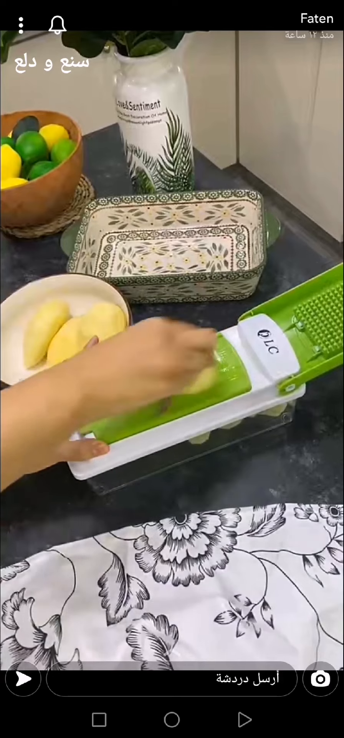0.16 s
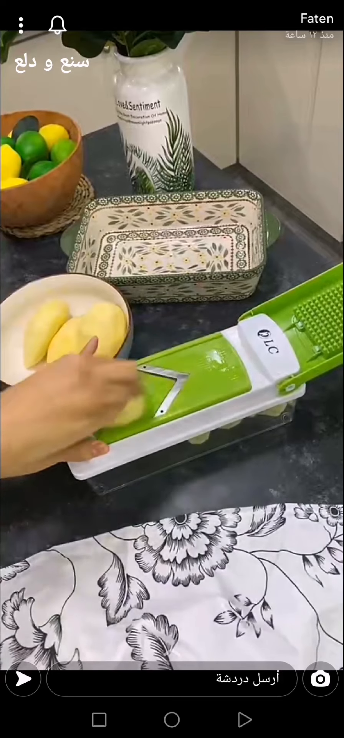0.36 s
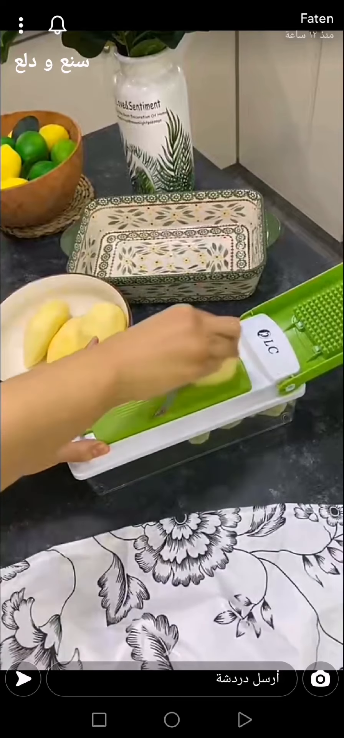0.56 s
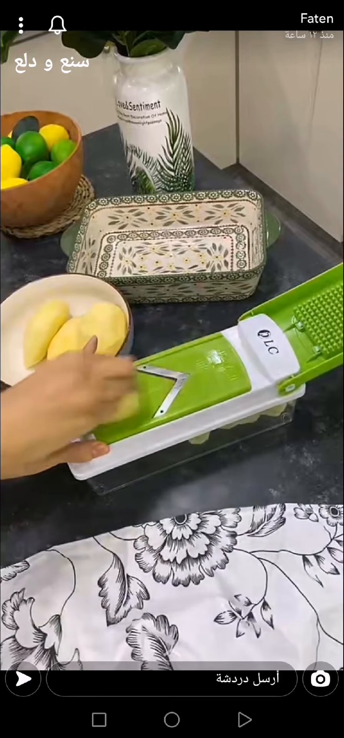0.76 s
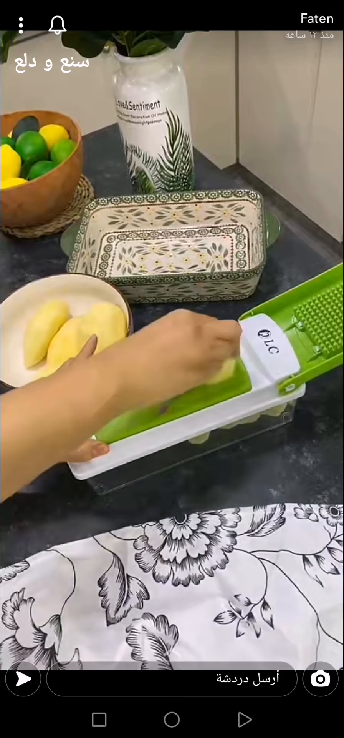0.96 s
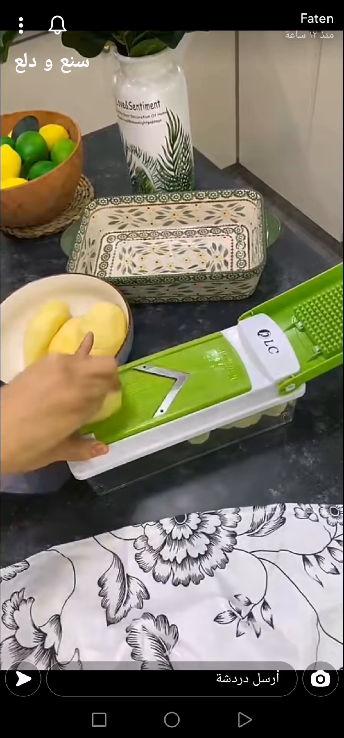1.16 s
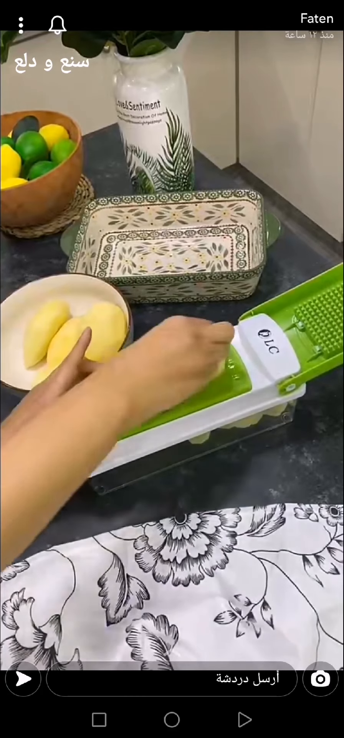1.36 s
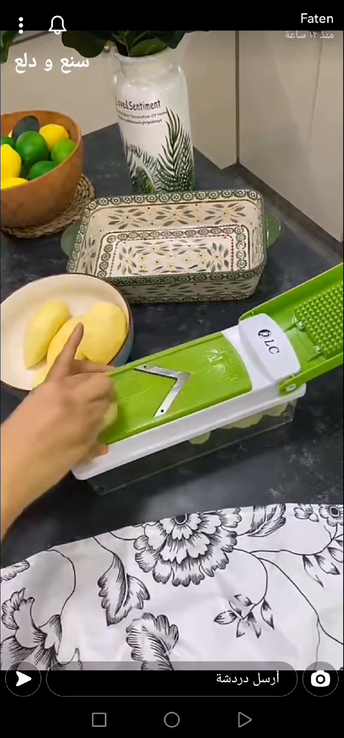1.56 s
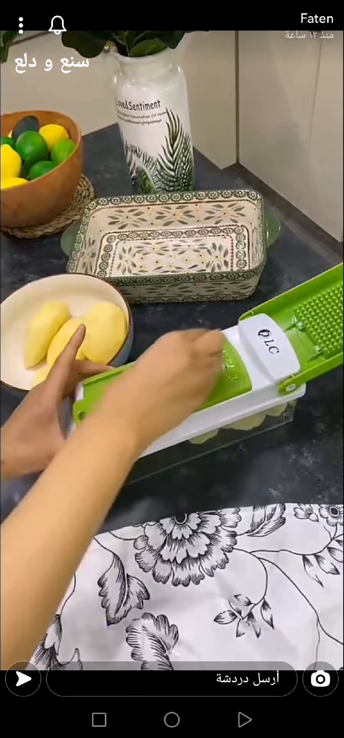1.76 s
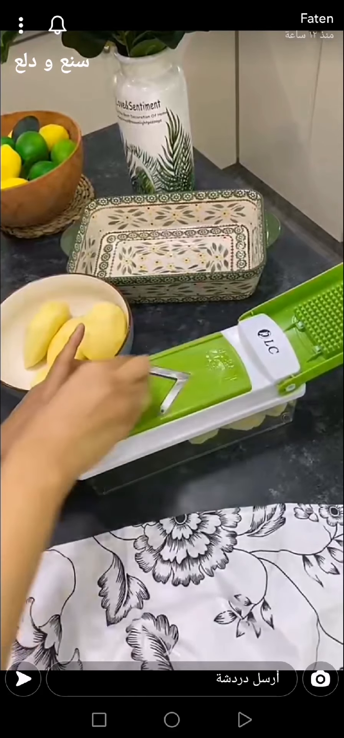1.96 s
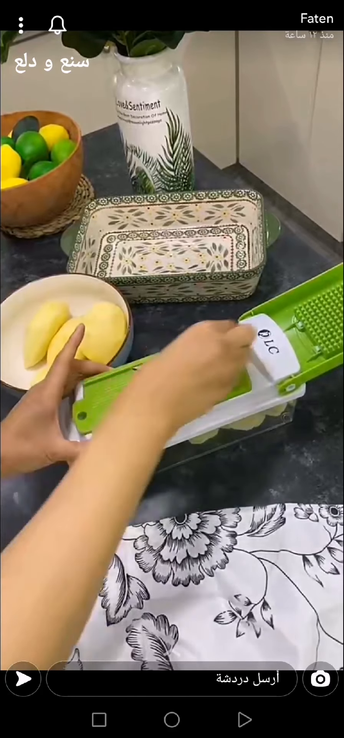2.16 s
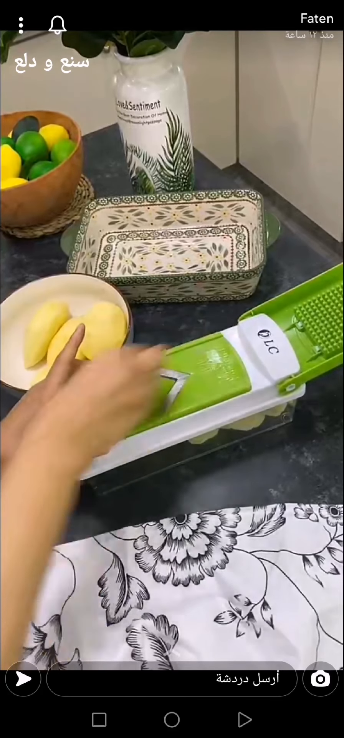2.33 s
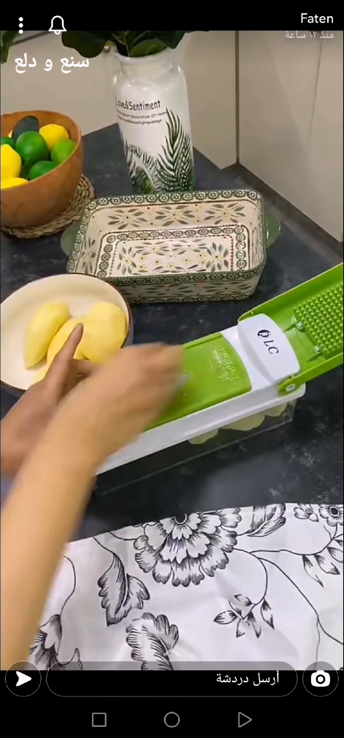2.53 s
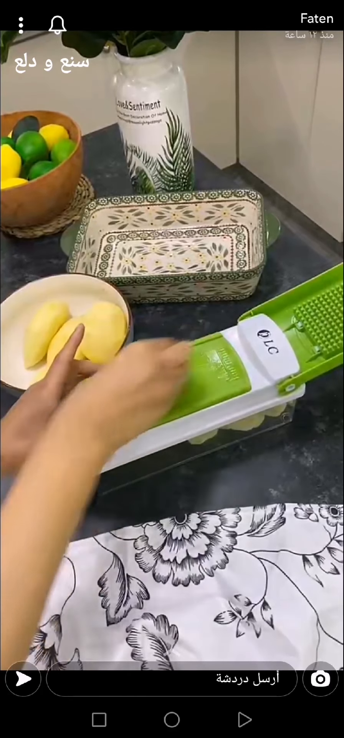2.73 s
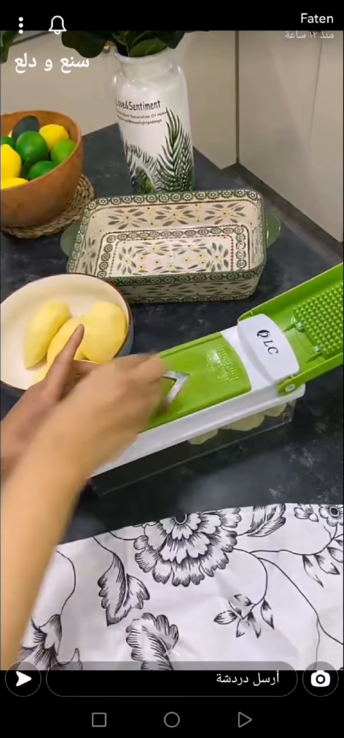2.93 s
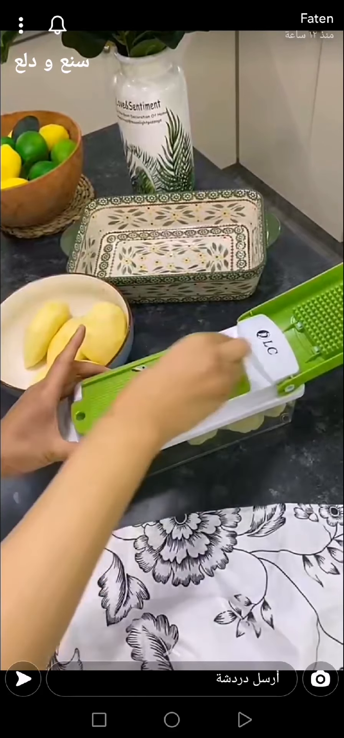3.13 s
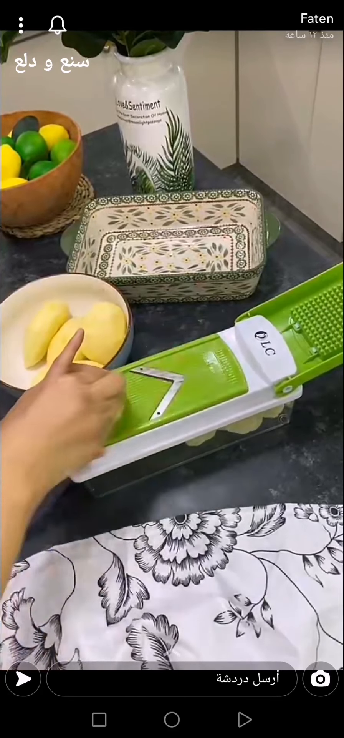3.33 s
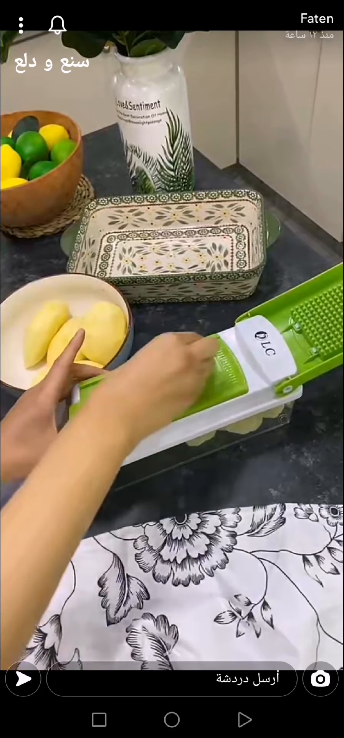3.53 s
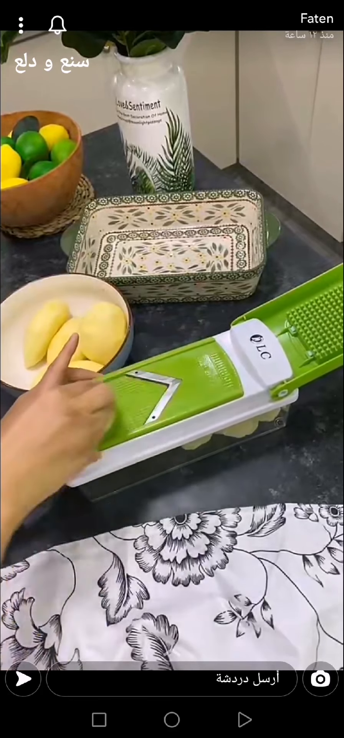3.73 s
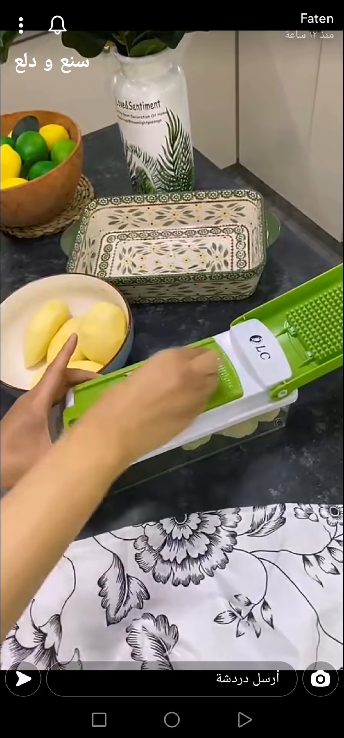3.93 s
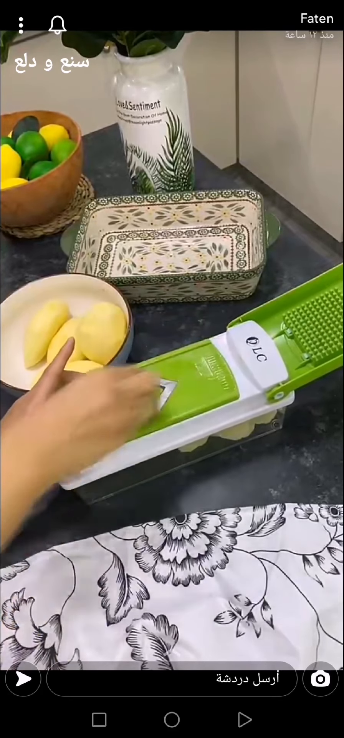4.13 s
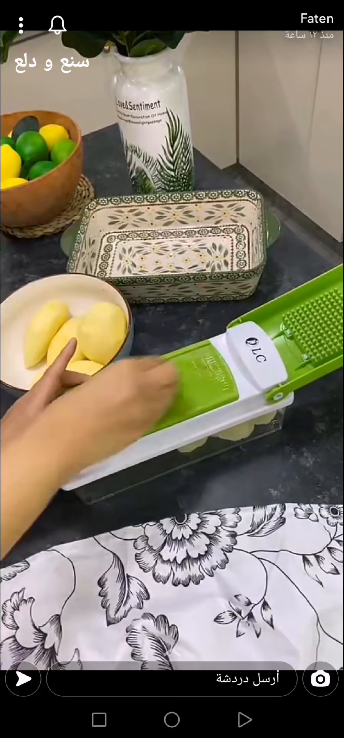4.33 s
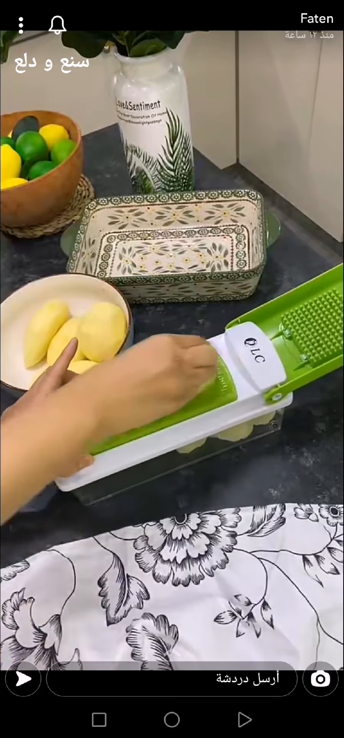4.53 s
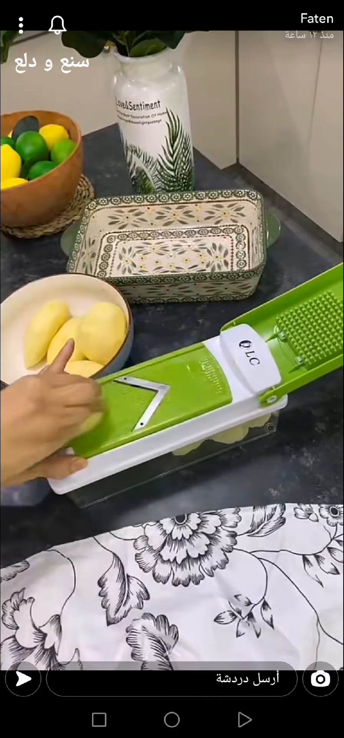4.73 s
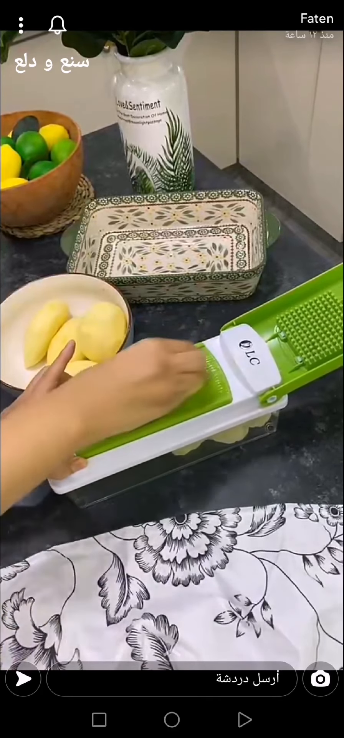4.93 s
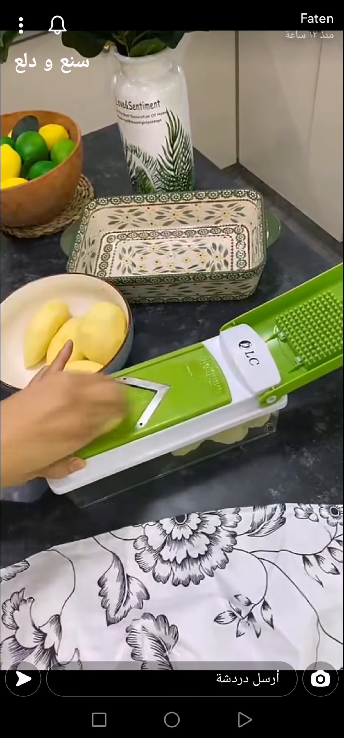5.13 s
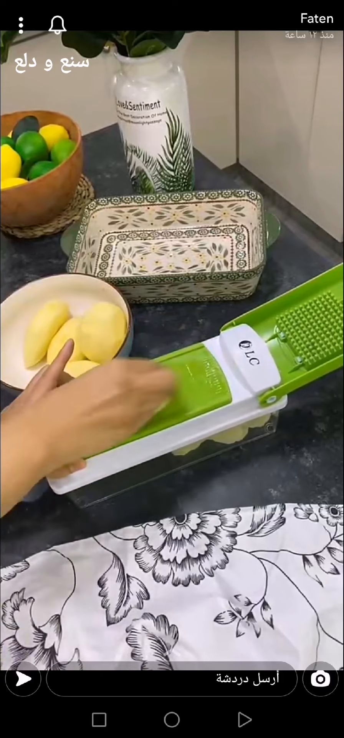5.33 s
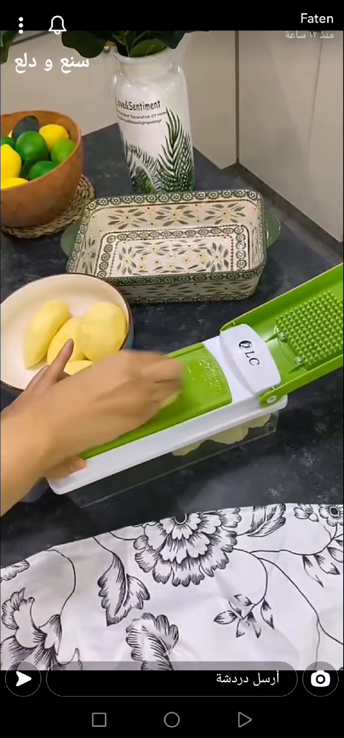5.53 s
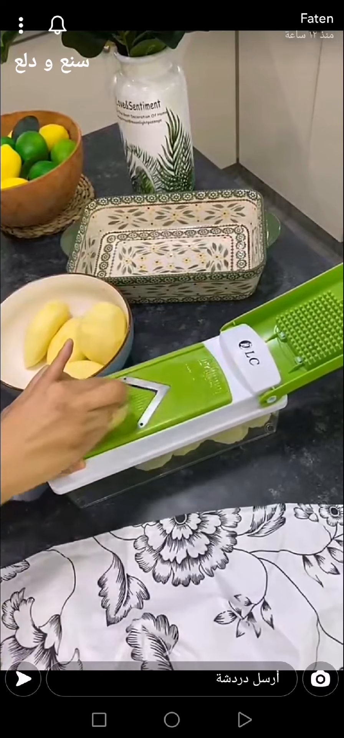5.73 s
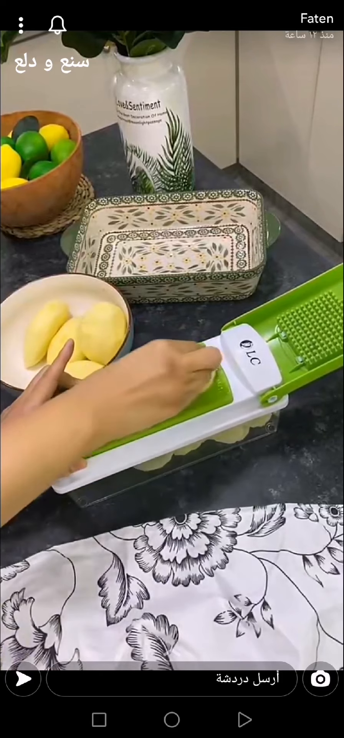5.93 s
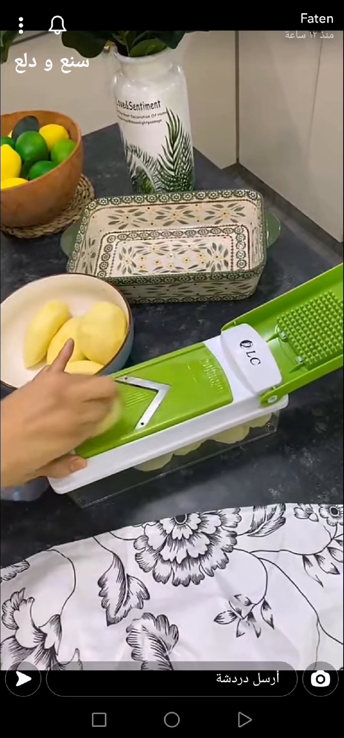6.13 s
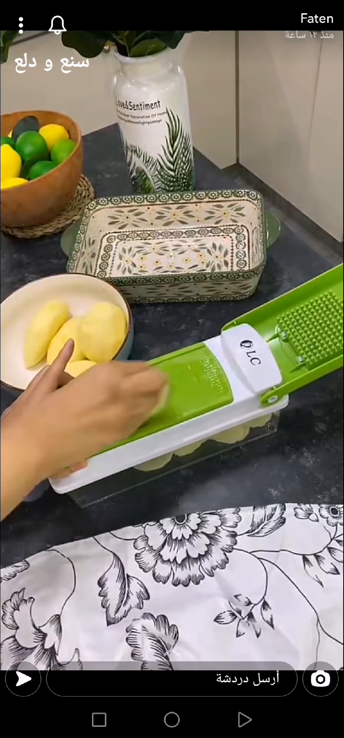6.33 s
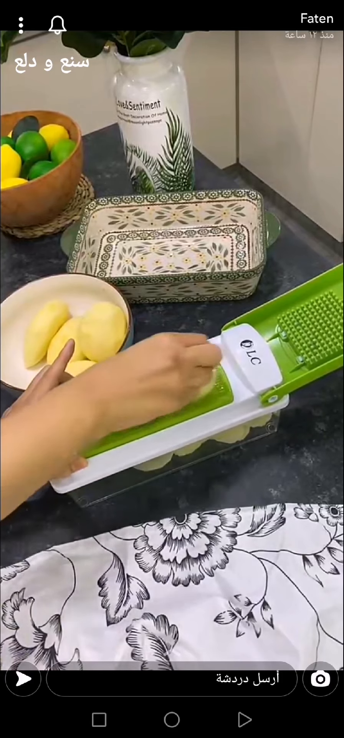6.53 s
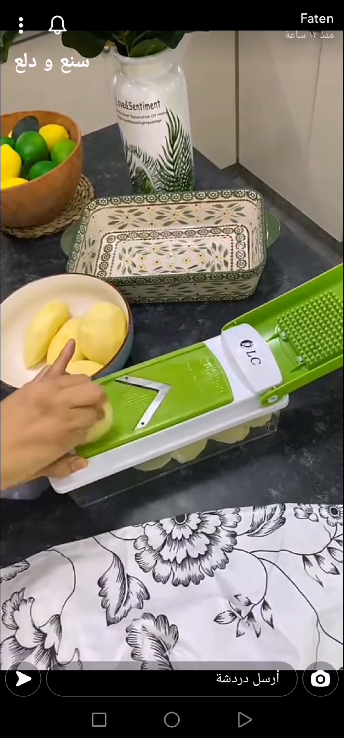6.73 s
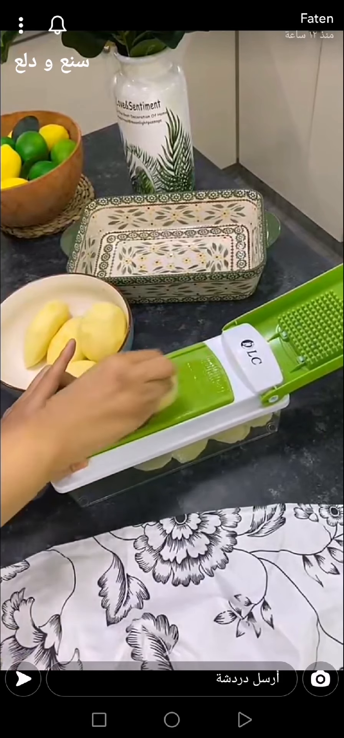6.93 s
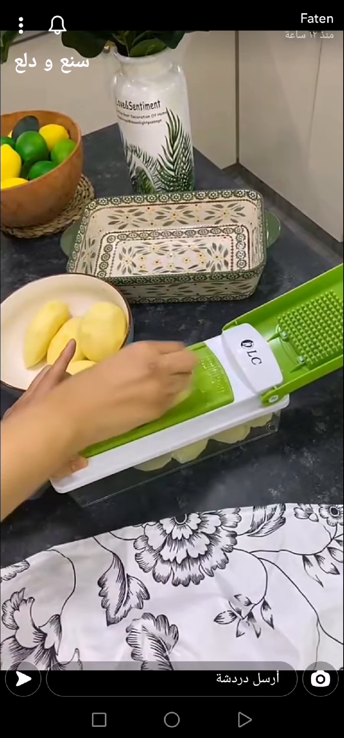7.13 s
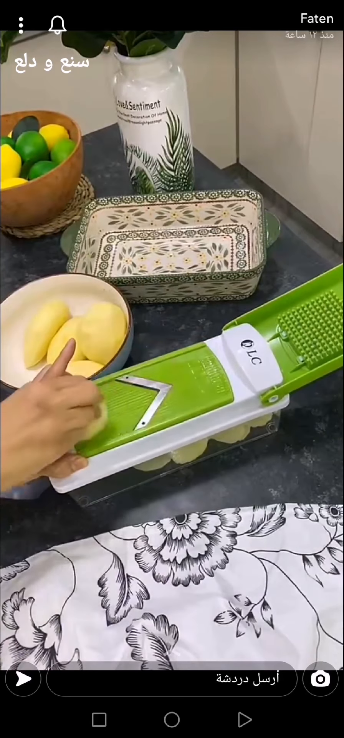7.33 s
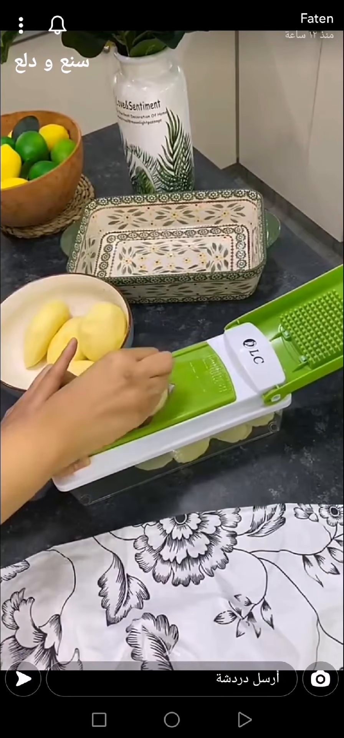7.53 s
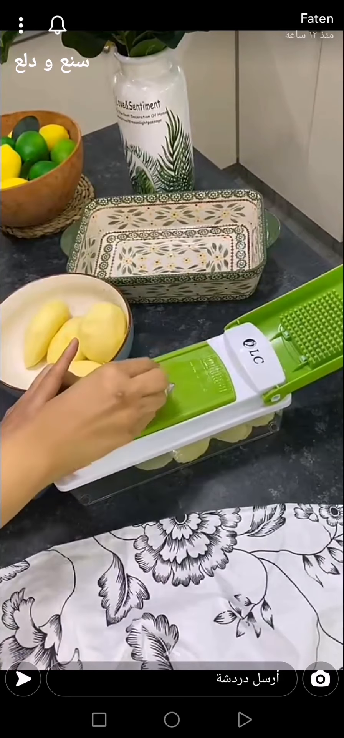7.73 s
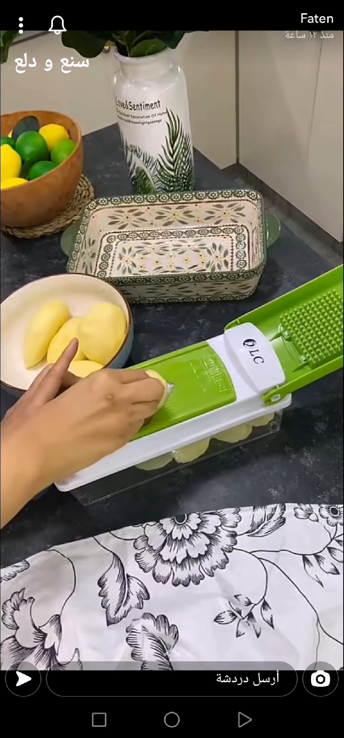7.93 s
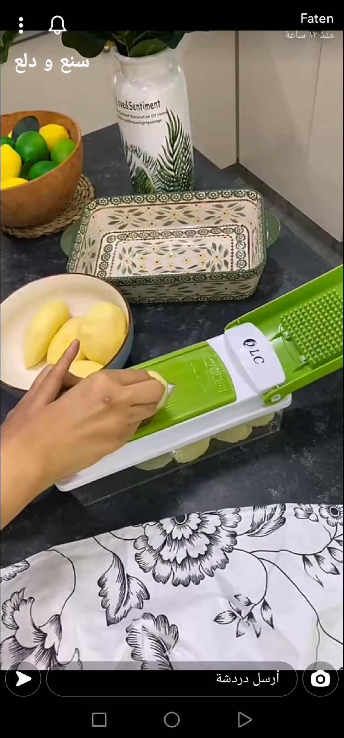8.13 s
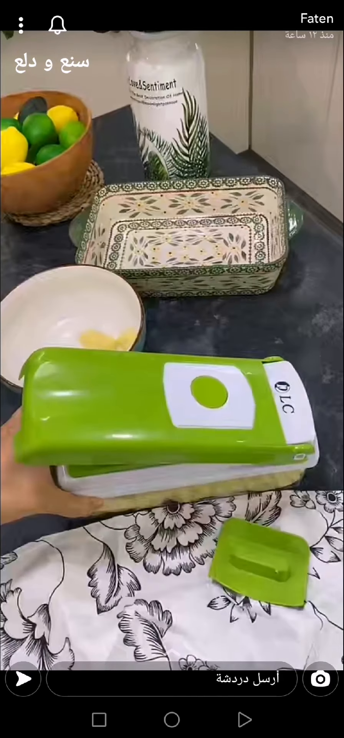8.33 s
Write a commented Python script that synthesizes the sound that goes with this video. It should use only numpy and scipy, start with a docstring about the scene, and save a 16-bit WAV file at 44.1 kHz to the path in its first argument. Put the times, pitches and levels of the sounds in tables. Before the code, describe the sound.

Steady rhythm of short, juicy slicing hisses and hollow plastic knocks, about two per second, close up in a quiet, hard-walled kitchen.

```python
"""First a raw potato knocks on the hollow deck of a plastic mandoline; then it is sliced, stroke by stroke.
Each cut is a wet hiss of random clicks, for bursting cells, over the rumble of the ringing deck. Then the
potato is drawn back and set down: a thud, a boom, a clack and a smack, at times a plastic snap. The mandoline
stands on its catch box on a counter. Fading noise makes the hard-walled kitchen's answer, under which lie
steady room air and a faint, wavering hum of an appliance."""
import sys
import numpy as np
from scipy import signal
from scipy.io import wavfile
from scipy.ndimage import uniform_filter1d

SR = 44100
rng = np.random.default_rng(int(sys.argv[2]) if len(sys.argv) > 2 else 0)


def to_wav(s):
    """Save 16-bit WAV."""
    ch = np.atleast_2d(s).T  # columns
    pcm = np.round(np.clip(ch, -1, 1) * 32767)  # PCM
    wavfile.write(sys.argv[1], SR, pcm.astype(np.int16))


N = 369558  # length of the scene in samples

# cuts through the blade, with levels at the hardest push:
# (time [s], length [s], hiss [dB], deck rumble [dB], place of the hardest push [0-1])
CUTS = [(0.19, 0.13, -42, -35, 0.4), (0.601, 0.15, -45, -38.5, 0.53), (1.048, .124, -43, -36, 0.51),
        (1.473, 0.13, -42.7, -37, 0.39), (1.909, .126, -45, -37, 0.56), (2.761, 0.14, -44.5, -38, 0.52),
        (3.182, 0.16, -49.5, -41, 0.31), (3.647, .14, -45.5, -38.5, 0.68), (4.105, 0.12, -55, -45, 0.75),
        (4.542, 0.13, -43.5, -35.5, 0.61), (5.03, .13, -43, -34.5, 0.51), (5.496, 0.15, -43, -37, 0.47),
        (5.972, 0.18, -44.5, -36.5, 0.28), (6.498, 0.16, -45.5, -39.5, .58),
        (7.058, 0.17, -45.5, -40, 0.62), (7.653, 0.12, -49.5, -41, 0.24)]
# the cut face slides over the wet deck, with levels at mid-slide:
# (time [s], length [s], hiss [dB], deck rumble [dB], swell from start to end [dB])
SLIDES = [(.4, 0.035, -54, -33, 11), (0.815, 0.083, -64, -42, 1), (1.237, 0.07, -68.5, -43, -20),
          (1.635, 0.042, -58, -42, -2), (2.085, 0.037, -53, -49, 14), (2.311, 0.14, -63.5, -52, -21),
          (2.447, 0.12, -71, -53.5, 10), (2.961, 0.2, -72.5, -53.5, -16), (3.413, .12, -75, -47, 17),
          (3.855, 0.0496, -62.5, -43.5, -1), (4.314, 0.059, -69, -54.5, -21), (4.365, 0.023, -61, -30, 9),
          (4.787, 0.058, -67.5, -45, 4), (6.822, 0.056, -71, -53.5, 13)]
# the potato lands on the deck: (time [s], skid before it [s], time until its weight bears [s],
# thud [dB], thud pitch [Hz], boom [dB], clack [dB], wet smack [dB])
LANDINGS = [(.011, 0.011, 0.016, -26, 309, -30.5, -33, -53), (0.108, 0, .012, -39.5, 346, -49, -42, -65),
            (.396, 0.0003, 0.0037, -49, 326, -44, -35, -71),
            (0.442, 0.00023, 0.0089, -25, 305, -35, -41, -60),
            (.808, 0.00034, 0.0053, -38, 389, -46, -33.5, -70),
            (.866, 0.00066, .014, -22, 306, -31, -28.5, -55), (1.053, 0, 0.0046, -39, 398, -64, -57, -69),
            (1.306, 0.011, 0.0093, -18.5, 302, -32, -24.5, -54),
            (1.715, 0.0084, 0.011, -18.5, 310, -34, -31, -46),
            (2.112, 0.0026, 0.01017, -33, 325, -52, -32.5, -46),
            (2.327, 0.00098, 0.0043, -43.5, 330, -61, -53, -62),
            (2.426, 0.00023, 0.0065, -43, 382, -40.5, -51, -61.5),
            (2.576, .01, .007, -21, 306, -29.5, -26, -54), (3.005, 0, 0.0037, -41, 312, -54, -63, -73),
            (3.459, 0, 0.0098, -28.5, 294, -35.5, -46, -74),
            (4.388, 0.0018, 0.014, -30.5, 318, -35, -43.5, -64),
            (4.856, 0.008, .01, -20, 328.5, -29.5, -31, -62.5),
            (5.317, 0.0036, 0.013, -18.5, 331, -30.5, -30.5, -50),
            (5.793, .007, 0.012, -17, 328, -35, -32, -70),
            (6.309, .011, 0.012, -19.5, 324.7, -34, -34, -64),
            (6.867, 0.0051, 0.007, -26.5, 361, -34.5, -28, -54.5),
            (7.447, 0.008, 0.0073, -23, 338, -41, -24, -54)]
# the plastic frame snaps against its box under a landing: (time [s], level [dB])
CRACK_TIMES = [(.108, -49), (.3962, -49.5), (0.8091, -53), (0.8674, -47), (1.307, -39.5), (1.718, -68),
               (2.1134, -40), (2.5762, -46.5), (6.866, -50)]

# what the deck rings with: (pitch [Hz], level [dB], time to fade by 60 dB [s])
DECK_MODES = [(275, -17, 0.19), (317.2, 2.5, 0.25), (366.1, 4.5, 0.15), (428.5, -3.5, 0.23),
              (499.5, -5.5, 0.25), (538.3, -5.5, 0.22), (584, -36, .25), (750, -9, 0.23), (773, -19, 0.11),
              (893.3, -10.5, 0.33)]
# what the catch box and the counter under it boom with: (pitch [Hz], level [dB], time to fade by 60 dB [s])
BOX_MODES = [(40, -25.5, 1), (73.5, -9, 0.36), (113.7, -1, 0.13), (149.8, 1, 0.12), (199, 6, 0.046)]
# the steel blade's resonances: (pitch [Hz], width [Hz], level [dB])
BLADE_MODES = [(2013, 87, 1), (2910, 245, 8.5)]

# colour of the bursting cells: (frequency [Hz], level [dB])
HISS_COLOUR = [(300, -39), (700, 14.5), (1200, 5), (1700, -1.5), (2350, 0), (3300, 3), (5000, -0.5),
               (7000, 1), (9300, 0.5), (10300, -4), (12000, -6), (14000, -5), (15800, -19)]
# colour of the crackling juice: (frequency [Hz], level [dB])
WET_COLOUR = [(300, -14), (1000, 5.5), (2000, 4), (4000, 1), (6500, -1), (9000, 1), (10500, -9),
              (15800, -7.5)]
# colour of the shaken deck: (frequency [Hz], level [dB])
RUMBLE_COLOUR = [(30, -32), (70, -15.5), (130, -4.5), (230, -4), (300, 4.5), (380, -0.5), (560, -3),
                 (750, -22), (1200, -23.5), (3000, -57)]
# colour of the clack on landing: (frequency [Hz], level [dB])
CLACK_COLOUR = [(30, -19), (70, 2.5), (200, 2.5), (450, 15), (800, 5.5), (1100, 0), (1500, -9.5),
                (2000, -10), (2400, -18), (2800, -18.5), (4000, -20.5), (8000, -55)]
# colour of the wet smack on landing: (frequency [Hz], level [dB])
SMACK_COLOUR = [(500, -1), (1500, -1.5), (3000, -1.5), (5000, 0), (8500, 5), (10500, -1.5), (14000, -4),
                (15800, -16)]
# colour of the plastic snap: (frequency [Hz], level [dB])
CRACK_COLOUR = [(500, -8), (1100, -4), (1900, 1.5), (2400, 0.5), (2800, -1), (3700, -5), (5000, -10),
                (7500, -13), (10000, -42), (15800, -38)]

# how long the kitchen rings: (frequency [Hz], time to fade by 60 dB [s])
KITCHEN_FADE = [(80, 0.44), (300, 0.22), (1000, 0.38), (3000, 0.37), (7000, 0.24), (14000, 0.16)]
# first echoes of the landings from counter, wall and cupboards: (delay [s], gain [factor])
ECHOES_BACK = [(.0062, 0.087), (0.0373, 0.29), (0.043, 0.079)]
# colour of the room air: (frequency [Hz], level [dB])
AIR_COLOUR = [(20, -28), (45, -22), (75, -3), (120, 1.5), (200, -5.5), (450, -2), (750, -4.5),
              (1400, -15.5), (2000, -15.5), (2400, -22), (4500, -28.5), (8500, -35.5), (11000, -40),
              (15800, -50)]
# level of the hum over time: (time [s], level [dB])
HUM_LEVEL = [(0, -54.5), (3.7, -53.5), (4.3, -71), (4.8, -59), (6.8, -55.5), (7.4, -61), (7.9, -69.5),
             (8.38, -62)]

AIR_DB, HUM_HZ = -62, 119.2
EDGE_HZ = 15800  # top of the band
ECHO_TOP_HZ = 3500  # the echoes lose their treble
# the push arches over each cut: how far under its top it starts and ends, and the rumble's share of that arch
ENTRY_DB, EXIT_DB, RUMBLE_SHARE = -13, -21.5, 0.76
BLADE_DETUNE = 0.035  # largest share by which the potato's load shifts the blade's pitches
# a skid swells into its landing: its hiss against the smack, its rumble against the clack, its swell
SKID_HISS_DB, SKID_RUMBLE_DB, SKID_SWELL_DB = -0.5, 5, 9
# after a landing the potato drags on and slows: length, hiss and rumble against the thud, swell
DRAG_S, DRAG_HISS_DB, DRAG_RUMBLE_DB, DRAG_SWELL_DB = 0.121, -44.5, -23.5, -8.5


def cut(length_s, hiss_db, rumble_db, crest, blade_db=-11.0, bite_db=-5, bite_s=0.024, uneven_db=0.23):
    """The push swells and eases; cells burst in clumps, and the blade rings most as it first bites in."""
    t, progress, grip = contact(length_s)
    rise_db = ENTRY_DB * (1 - progress / crest) ** 2
    fall_db = EXIT_DB * ((progress - crest) / (1 - crest)) ** 2
    push_db = np.where(progress < crest, rise_db, fall_db)
    hiss = grip * amp(hiss_db + push_db)
    shake = grip * amp(rumble_db + RUMBLE_SHARE * push_db)

    clumps = unit(uniform_filter1d(rng.standard_normal(len(t)), size=260))
    cells = grains(len(t), per_s=8000, spread_db=0.5) * amp(uneven_db * clumps)
    crunch = unit(colour(cells, HISS_COLOUR))

    load = 1 + BLADE_DETUNE * rng.uniform(-0.58, 1)
    steel = np.zeros(len(t))
    for hz, width, db in BLADE_MODES:
        steel += amp(db) * np.exp(-np.pi * width * t) * np.sin(2 * np.pi * hz * load * t)
    bite = amp(blade_db) + amp(bite_db) * np.exp(-t / bite_s)
    blade = bite * unit(ring(cells, steel))

    slicing = nearby(hiss * (crunch + blade), strength=0.064, spread_s=0.0018)
    return kitchen(slicing + shake * rumble(t), wet_db=-7.0)


def slide(length_s, hiss_db, rumble_db, swell_db):
    """The cut face drags over a crackling film of juice, gathering or losing speed."""
    t, progress, grip = contact(length_s)
    drag = grip * amp(swell_db * (progress - 0.5))
    pops = grains(len(t), per_s=2500, spread_db=2.5)
    film = nearby(unit(colour(pops, WET_COLOUR)), strength=0.55)
    return kitchen(drag * (amp(hiss_db) * film + amp(rumble_db) * rumble(t)), wet_db=-0.5)


def rumble(t, ring_db=-5):
    """Small slips of the potato shake the deck and make it ring."""
    slips = grains(len(t), per_s=740, spread_db=2)
    shaking = unit(colour(slips, RUMBLE_COLOUR))
    ringing = unit(ring(slips, modes(DECK_MODES, t)))
    return unit(shaking + amp(ring_db) * ringing)


def contact(length_s, edge_s=0.015, start_s=0.0038, size=26000):
    """Time, progress 0-1 and grip 0-1 through one stroke and the silence after it."""
    t = np.arange(size) / SR
    touching = uniform_filter1d(1.0 * (t < length_s), max(int(edge_s * SR), 1))
    grip = touching * (1 - np.exp(-t / start_s))
    return t, np.minimum(t / length_s, 1), grip


def knock(settle_s, thud_db, hz, boom_db, clack_db, smack_db, deck_ring_db=-7, size=26000):
    """Juice smacks and plastic clacks on touch; under the weight the deck flexes and rings, and its box booms."""
    t = np.arange(size) / SR
    loaded = np.maximum(t - max(settle_s - 0.007, 0), 0)  # time since the weight began to bear
    swell = loaded / 0.005  # the soft potato brings its weight down gradually
    flex = swell ** 2 * np.exp(-1.5 * swell) * np.sin(2 * np.pi * hz * loaded)
    thud = amp(thud_db) * blow(flex)
    deck = amp(thud_db + deck_ring_db) * blow(modes(DECK_MODES, loaded))
    boom = amp(boom_db) * blow(modes(BOX_MODES, loaded) * (1 - np.exp(-loaded / 0.00094)))

    touch = t / max(settle_s, 0.002)  # a slow landing spreads the contact out, a quick one snaps
    clack = amp(clack_db) * burst(touch * np.exp(-touch / 0.43), CLACK_COLOUR, wet_db=1.5)
    smack = amp(smack_db) * burst(touch ** 2 * np.exp(-touch / 0.13), SMACK_COLOUR, wet_db=2.0)
    return kitchen(thud + deck + boom, wet_db=-12) + clack + smack


def crack(db, size=26000):
    """A dry snap of plastic on plastic: noise that dies away within milliseconds, plus the room."""
    t = np.arange(size) / SR
    return amp(db) * burst(np.exp(-t / 0.0039), CRACK_COLOUR, wet_db=-2.0)


def burst(envelope, spectrum, wet_db):
    """A short flurry of contacts, made of noise, and its wash in the room."""
    direct = nearby(envelope * rng.standard_normal(len(envelope)), strength=0.073, spread_s=0.0023)
    direct /= np.linalg.norm(direct)
    return blow(colour(direct + amp(wet_db) * tail(), spectrum))


def modes(table, t):
    """A body's answer to one tap: fading sine tones, every other one turned upside down."""
    total = np.zeros(len(t))
    for k, (hz, db, fade_s) in enumerate(table):
        total += (-1) ** k * amp(db - 60 * t / fade_s) * np.sin(2 * np.pi * hz * t)
    return total


def nearby(x, strength=0.25, spread_s=0.0079, count=6):
    """The moving hand and the box walls reflect a sound at once, colouring each stroke differently."""
    taps = np.zeros(int(spread_s * SR) + 6)
    taps[0] = 1
    for place, sign in rng.uniform(-1, 1, (count, 2)):
        taps[4 + int(abs(place) * spread_s * SR)] += strength * np.sign(sign)
    return ring(x, taps / np.linalg.norm(taps))


def kitchen(x, wet_db):
    """Adds the room's answer to a sound, keeping its power about the same."""
    return (x + amp(wet_db) * ring(x, tail())) / np.hypot(1, amp(wet_db))


def tail(build_s=0.012, size=26000):
    """The kitchen's diffuse answer to a click: fresh noise, each band dying at its own speed."""
    hz, t, bands = signal.stft(rng.standard_normal(size), SR, nperseg=256)
    fade = amp(-60 * t / read(KITCHEN_FADE, hz)[:, None])
    wash = signal.istft(bands * fade, SR, nperseg=256)[1][:size]
    wash *= 1 - np.exp(-np.arange(size) / SR / build_s)
    return wash / np.linalg.norm(wash)


def background(waver=0.99):
    """Steady room air, as coloured noise, and an appliance's hum, as a sine of wavering strength."""
    t = np.arange(N) / SR
    air = amp(AIR_DB) * unit(colour(rng.standard_normal(N), AIR_COLOUR))
    slow = signal.butter(2, 7, fs=SR, output="sos")
    drift = unit(signal.sosfilt(slow, rng.standard_normal(N)))
    hum = (1 + waver * drift) * np.sin(2 * np.pi * HUM_HZ * t)
    return air + amp(np.interp(t, *np.transpose(HUM_LEVEL))) * unit(hum)


def grains(size, per_s, spread_db):
    """Random clicks, most of them small and a few large."""
    height = amp(spread_db * np.minimum(rng.exponential(1, size), 4))
    return height * rng.choice([-1, 1], size) * (rng.random(size) < per_s / SR)


def colour(x, points, size=4096):
    """Filters a sound to a given spectrum, with no sound ahead of its cause (minimum phase)."""
    log_gain = np.log(amp(read(points, abs(np.fft.fftfreq(size, 1 / SR)))))
    response = np.fft.ifft(np.exp(np.conj(signal.hilbert(log_gain)))).real
    return ring(x, response[:size // 2])


def ring(x, response):
    """Lets every sample set off the response (convolution), keeping the length."""
    return signal.fftconvolve(x, response)[:len(x)]


def read(points, hz):
    """Joins a table by straight lines on a log-frequency axis."""
    f, value = np.transpose(points)
    return np.interp(np.log(hz + 1), np.log(f + 1), value)


def amp(db):
    """Turns decibels into gain."""
    return 10 ** (np.asarray(db) / 20)


def unit(x):
    """Scales to an rms (average strength) of 1."""
    return x / np.sqrt(np.mean(x ** 2) + 1e-20)


def blow(x):
    """Scales a short sound to the energy of 1024 samples at rms 1."""
    return x * np.sqrt(1024 / np.sum(x ** 2))


def add(mix, s, sound):
    """Mixes a sound in at time s, in seconds."""
    part = mix[max(round(s * SR), 0):][:len(sound)]
    part += sound[:len(part)]


def scene():
    """Cuts, slides and knocks over the quiet of the kitchen."""
    mix, knocks = background(), np.zeros(N)
    for s, *stroke in CUTS:
        add(mix, s, cut(*stroke))
    for s, *stroke in SLIDES:
        add(mix, s, slide(*stroke))
    for s, skid_s, settle_s, thud_db, hz, boom_db, clack_db, smack_db in LANDINGS:
        add(knocks, s, knock(settle_s, thud_db, hz, boom_db, clack_db, smack_db))
        add(mix, s, slide(DRAG_S, thud_db + DRAG_HISS_DB, thud_db + DRAG_RUMBLE_DB, DRAG_SWELL_DB))
        if skid_s > 0:
            skid = slide(skid_s, smack_db + SKID_HISS_DB, clack_db + SKID_RUMBLE_DB, SKID_SWELL_DB)
            add(mix, s - skid_s, skid)
    for s, db in CRACK_TIMES:
        add(mix, s, crack(db))
    dulled = signal.sosfilt(signal.butter(1, ECHO_TOP_HZ, fs=SR, output="sos"), knocks)
    for delay_s, gain in ECHOES_BACK:
        add(mix, delay_s, gain * dulled)
    return (mix + knocks)[None]


def record(dry, low_hz=33):
    """A small microphone loses the deepest bass; then a steep filter ends the band at the top."""
    thin = signal.sosfilt(signal.butter(4, low_hz, "high", fs=SR, output="sos"), dry)
    band = signal.firwin(511, EDGE_HZ, window=("kaiser", 9), fs=SR)
    return signal.oaconvolve(thin, band[None], "same")


dry = scene()
out = record(dry)
to_wav(out)
```